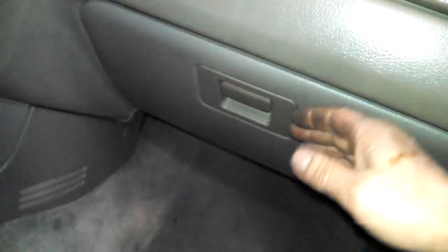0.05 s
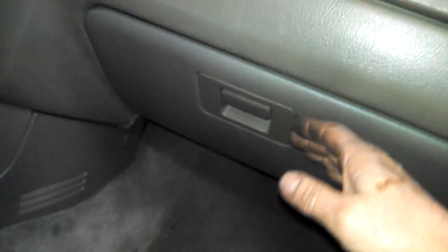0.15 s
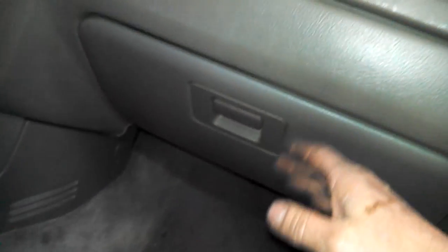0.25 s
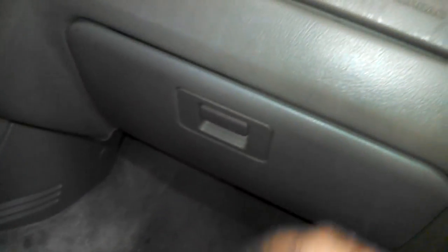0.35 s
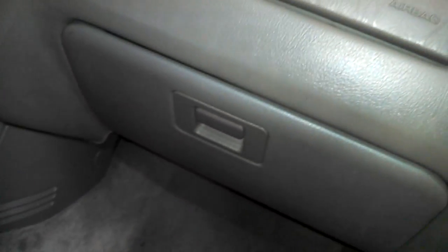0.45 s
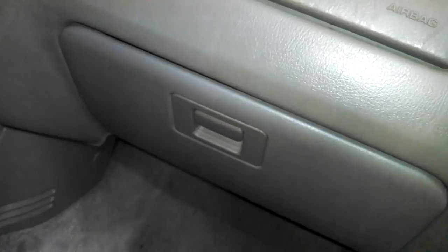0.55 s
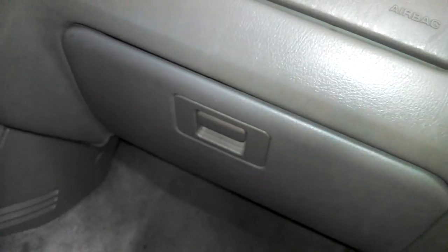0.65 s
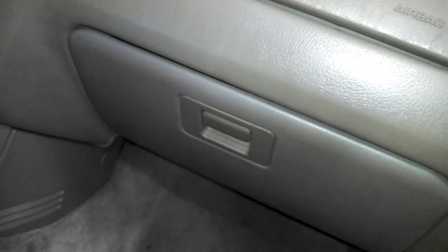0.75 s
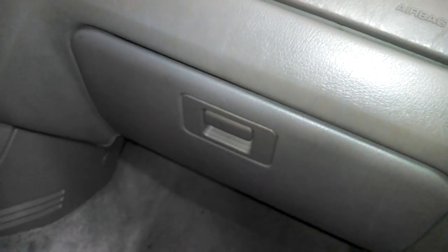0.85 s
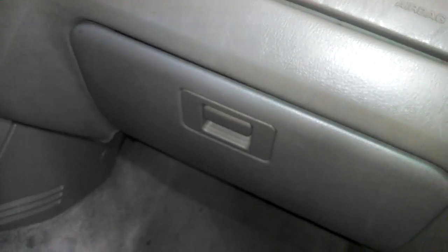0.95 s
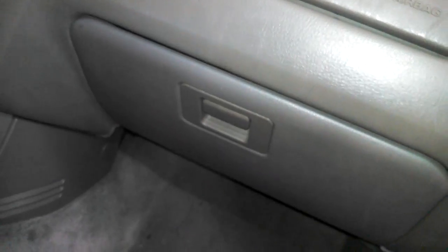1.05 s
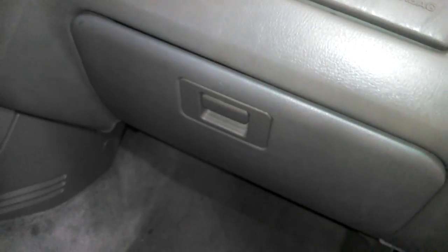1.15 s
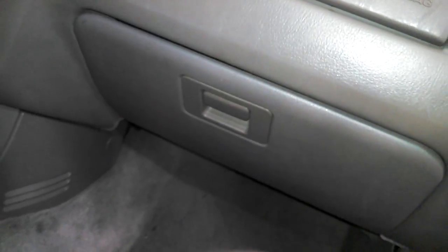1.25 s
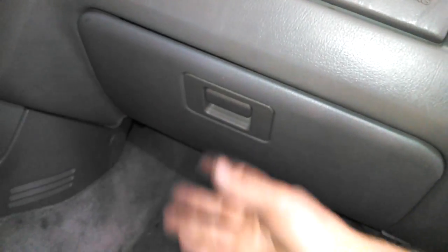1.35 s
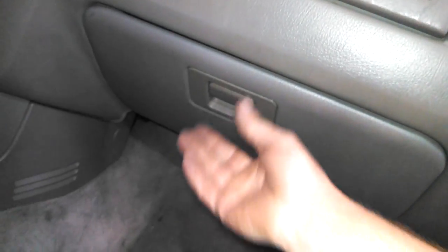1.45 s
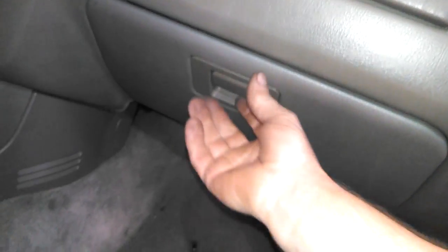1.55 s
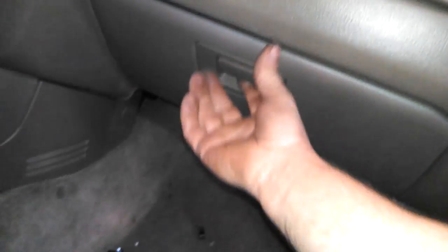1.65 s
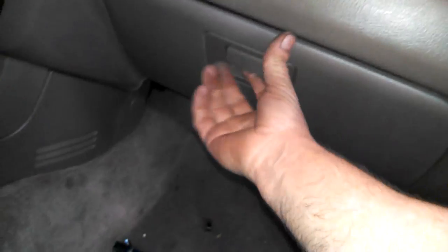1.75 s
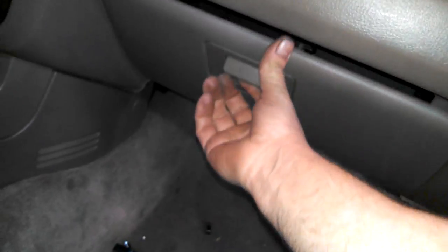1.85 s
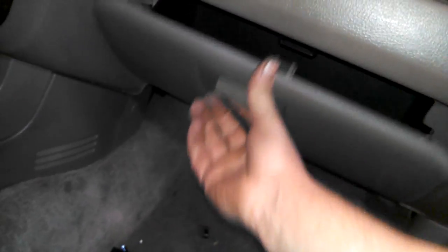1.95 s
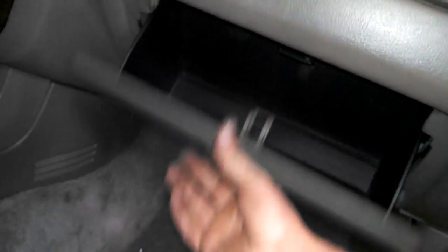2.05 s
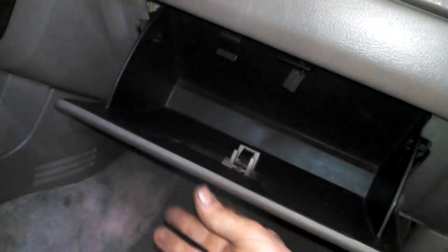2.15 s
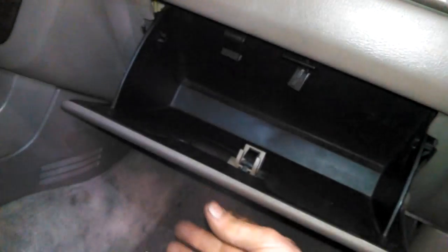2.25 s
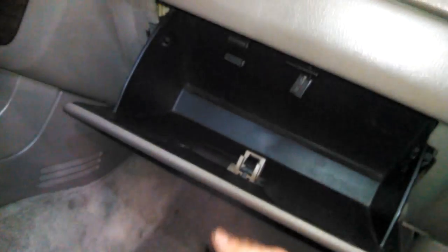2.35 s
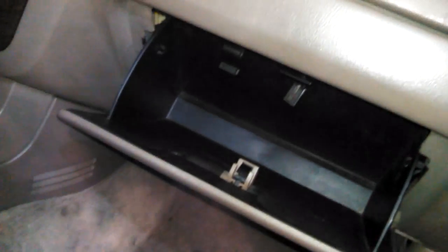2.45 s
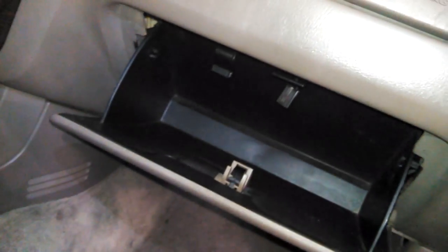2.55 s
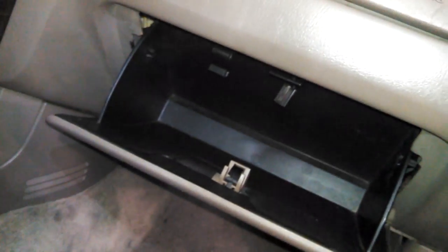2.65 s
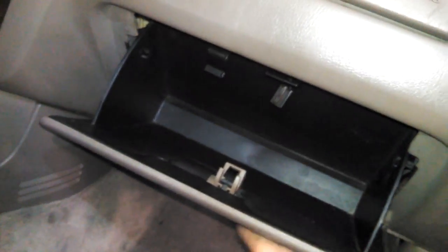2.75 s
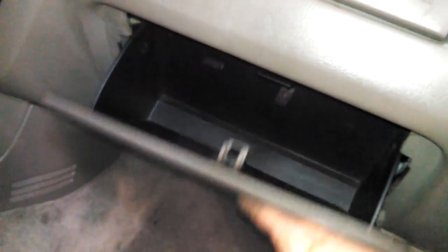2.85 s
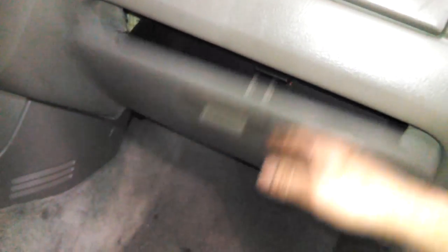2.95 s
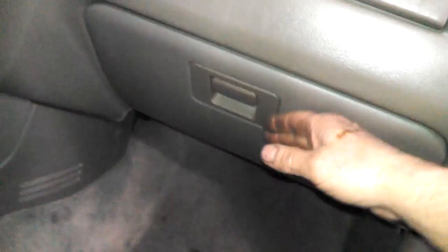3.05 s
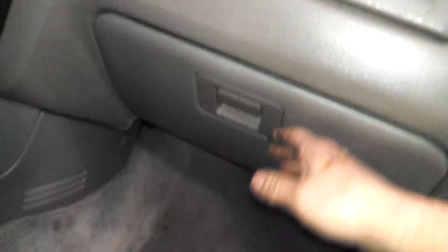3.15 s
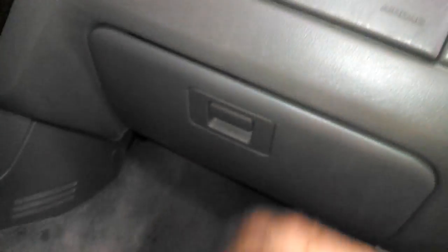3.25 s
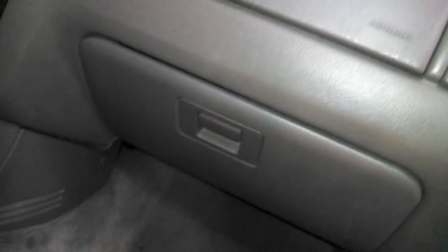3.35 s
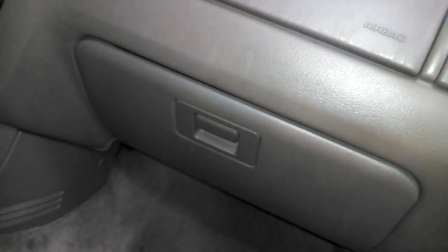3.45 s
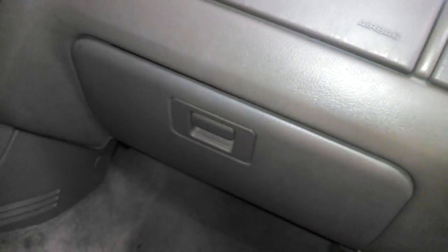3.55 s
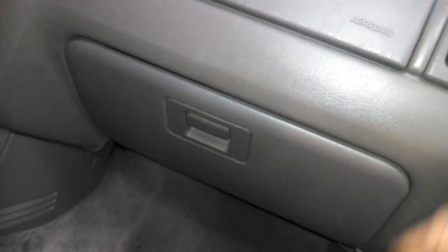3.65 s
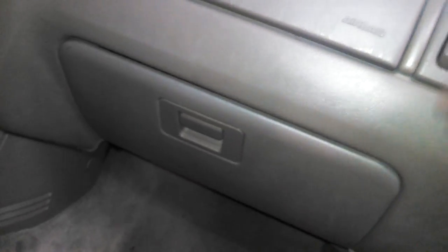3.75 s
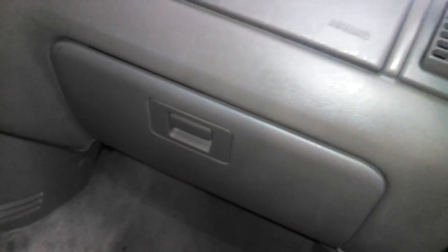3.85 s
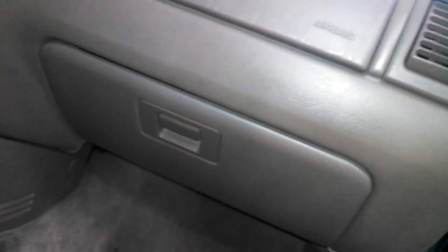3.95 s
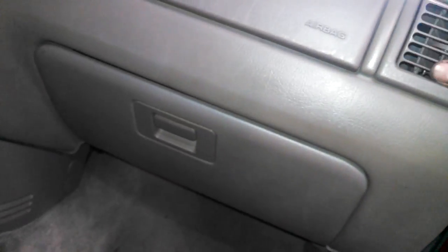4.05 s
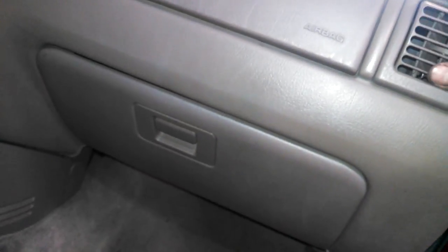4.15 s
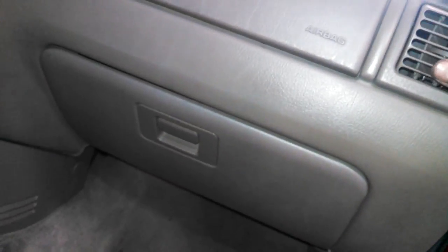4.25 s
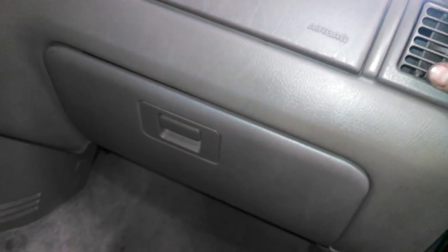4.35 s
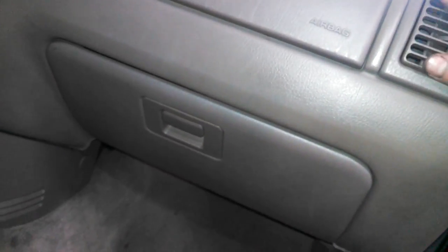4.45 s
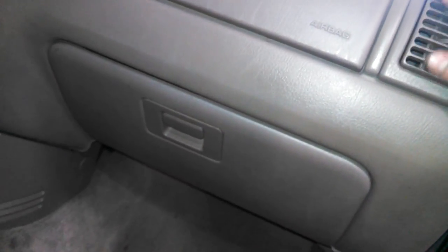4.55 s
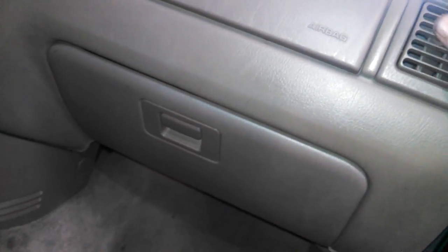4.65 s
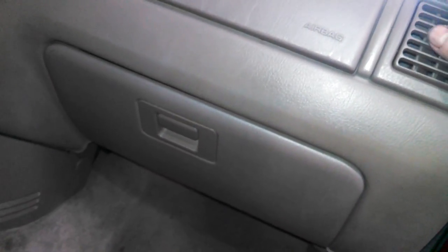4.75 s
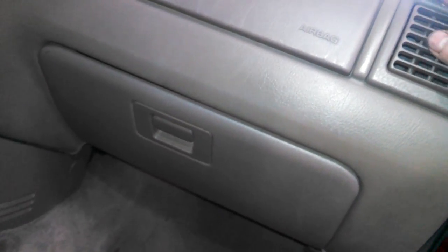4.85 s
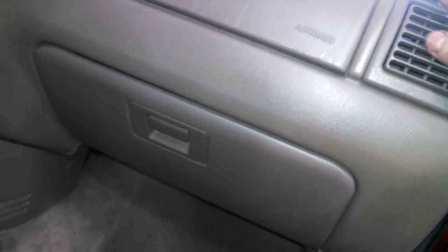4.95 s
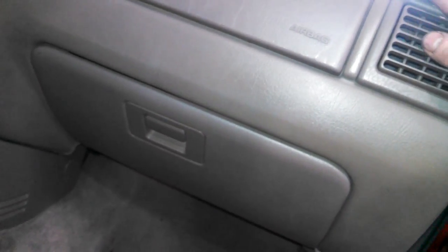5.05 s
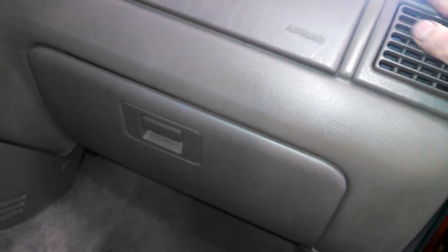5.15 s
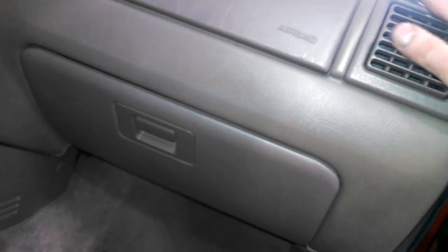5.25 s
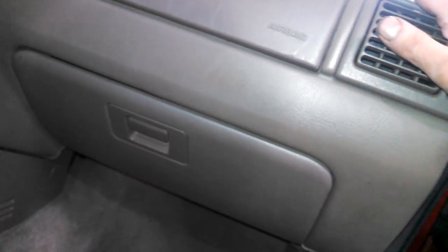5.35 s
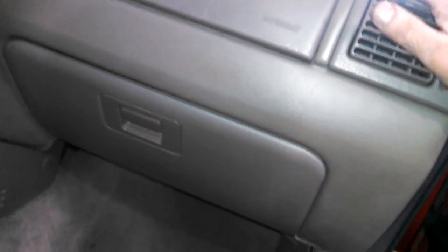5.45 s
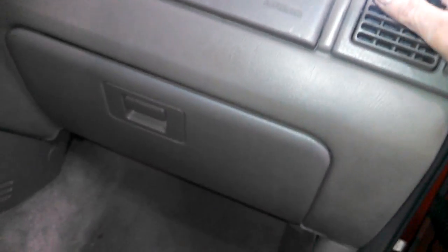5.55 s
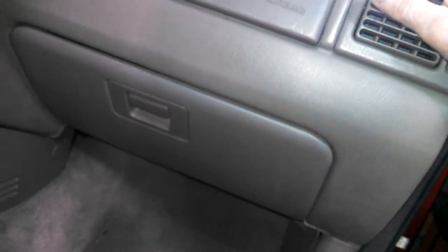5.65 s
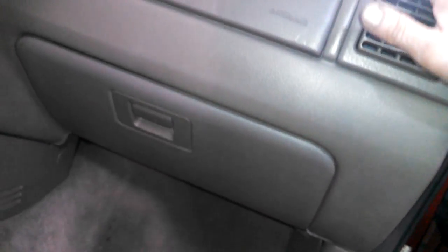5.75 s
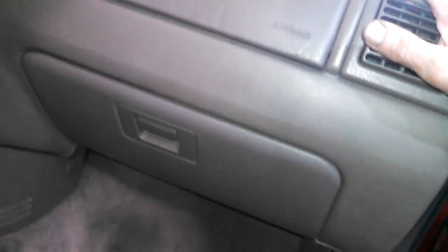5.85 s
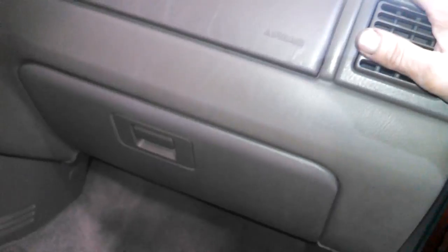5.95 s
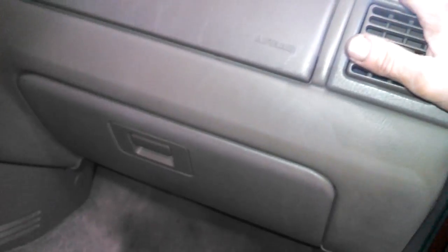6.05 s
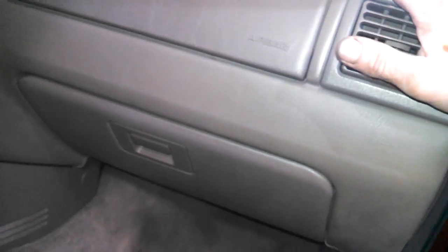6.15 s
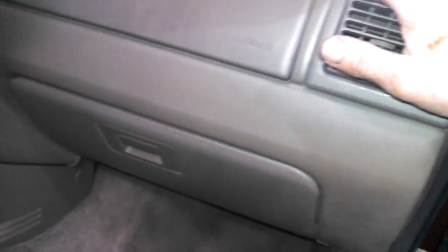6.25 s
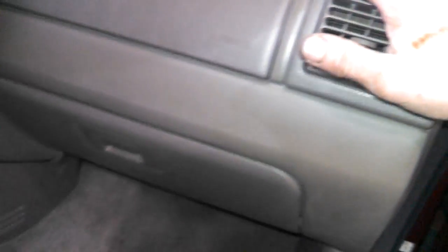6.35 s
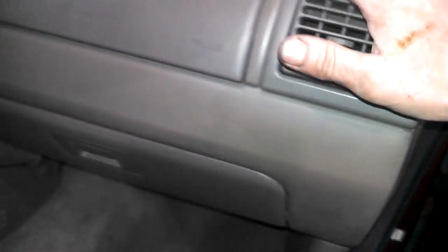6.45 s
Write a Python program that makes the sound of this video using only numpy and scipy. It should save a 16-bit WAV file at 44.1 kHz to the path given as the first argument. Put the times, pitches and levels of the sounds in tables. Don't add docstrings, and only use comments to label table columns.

```python
import sys
import numpy as np
from scipy import signal
from scipy.fft import rfft, irfft, next_fast_len
from scipy.io import wavfile
from scipy.ndimage import uniform_filter1d

SR = 44100
rng = np.random.default_rng(int(sys.argv[2]) if len(sys.argv) > 2 else 0)


def master(y):
    cut = np.clip(np.atleast_2d(y).T, -1, 1)
    pcm = np.round(cut * 32767)
    wavfile.write(sys.argv[1], SR, pcm.astype(np.int16))


def field_ratio(decibels):
    return 10 ** (np.asarray(decibels, dtype=float) / 20)


N = 286307

# [t/s, strength/dB]
SLAMS = [
    (.2740, 0),
    (3.2270, -.4),
]
# [delay/s, click level/dB, knock level/dB, knock f/Hz, tilt/(dB per octave)]
SLAM = [
    (0, -14, -20, 1700, -1.5),
    (.0023, -26, -13, 527, -1.5),
    (.0097, -10.5, -29.5, 1000, 2.5),
    (0.0114, -13.5, -26.5, 1300, -0.5),
    (0.0164, -19, -27, 800, 2),
]
# [t/s, click level/dB, knock level/dB, knock f/Hz, tilt/(dB per octave)]
TAPS = [(.2440, -22, -19, 3200, -5), (.2480, -44, -14.5, 860, -7), (.3990, -53, -56, 900, -4),
        (.4390, -44, -39, 1200, -3), (2.0072, -27, -32, 1510, 3), (2.0127, -14.5, -22.5, 2190, 0),
        (2.0160, -37, -34, 1800, 2), (2.0220, -51, -34, 1100, 0), (2.0320, -44, -45, 500, -19),
        (2.2878, -23.5, -31, 1230, 5), (2.2885, -31, -29, 1910, -0.2), (3.0340, -34.5, -31.5, 1490, -4.5),
        (3.1330, -28.5, -25, 1540, -0.2), (3.1355, -22.5, -29, 1900, 10), (3.2470, -40, -30, 190, -.1),
        (3.2500, -34, -35, 2280, -1.1), (3.2760, -46, -49, 3700, -1)]
# [f/Hz, width/Hz, level/dB]
LATCH_MODES = [(2200, 1500, -2), (4900, 1000, 3), (7300, 2000, -3), (9600, 1800, -1), (13000, 2200, -5),
               (15000, 1500, -5)]
# [f/Hz, width/Hz, level/dB]
PANEL_MODES = [(211, 150, -8), (1350, 1100, -11.5)]
# [f/Hz, t60/s]
CABIN_DECAY = [(200, .22), (3000, .14), (10000, .1)]
# [t/s, length/s, from f/Hz, to f/Hz, level/dB]
SQUEAKS = [
    (2.597, .062, 11400, 15800, -49),
    (2.66, .1, 13900, 14100, -51),
    (2.78, .078, 15050, 12800, -48),
    (2.755, .1, 12400, 11600, -53),
]
# [t/s, length/s, level/dB]
HISS = (.645, .33, -43)
# [f/Hz, width/Hz, level/dB]
HISS_MODES = [(12000, 1600, -3), (14200, 2200, 0)]
# [t/s, peak level/dB, f/Hz, t60/s]
BUMPS = [
    (3.776, -30, 80, .1),
    (3.819, -34, 260, .06),
    (3.874, -35, 85, .1),
    (4.268, -37, 90, .1),
]
# [f/Hz, level/dB]
AIR_SPECTRUM = [(60, -66), (170, -9.5), (330, -7), (650, -5.5), (900, -9.5), (1250, -16), (2000, -18.5),
                (4000, -24.5), (7000, -30), (9300, -29.5), (12000, -34), (15450, -32.5), (15750, -67),
                (20000, -120)]
# [f/Hz, width/Hz, level/dB]
DUCT_MODES = [(262.6, 22, -1), (393.3, 64.5, 2.5), (529.5, 108, 2.5), (846, 18, -6), (985, 74, -14),
              (1558, 51, -10), (2000, 31, -41), (3210, 300, -15.5)]
# [f/Hz, level/dB]
BOOM_SPECTRUM = [(20, -36), (35, -28), (47, -11), (60, 2), (90, -0.5), (150, -12), (220, -11.5), (400, -30),
                 (800, -120)]
# [f/Hz, width/Hz, level/dB]
FOOTWELL_MODE = [(113.5, 38.3, 0)]
# [f/Hz, phase turn/rad, level/dB, likeness/(0-1)]
PORT = [(40, .45, -1.8, .98), (65, .65, -3.5, .98), (95, 1.3, -7, .95), (120, 2, -9, .96),
        (150, 2.5, -3, .88), (300, 2.6, -.3, .9), (420, 3.4, -.3, .86), (600, 3.5, -2, .55),
        (720, 4.6, -1, .2), (900, 5.6, 0, .75), (1400, 6.2, 1.5, .93), (2050, 6.1, 3.5, .8),
        (2750, 6.28, .5, .97), (4400, 6.28, 1.5, .93), (15000, 6.28, .4, .94)]
# [t/s, depth/dB]
DUCKS = [
    (.246, 1.5),
    (0.273, 23),
    (2.014, 7.5),
    (2.29, 0.38),
    (3.133, 0.5),
    (3.23, 18.5),
]

RATTLE_S, RATTLE_S_PER_DB = 0.039, -0.15
GRAIN_DB = 4
LATCH_TOP_HZ = 16400
FULL_GAIN_DB, RECOVER_DB_PER_S = -1.5, 9
GRAB_S, SETTLE_S, SETTLE_SHARE = .013, .06, .3
PORT_LAG = 16


def along(points, hz, axis=1):
    columns = np.transpose(points)
    return np.interp(np.log(hz + 1), np.log(columns[0] + 1), columns[axis])


def unit(x):
    return x / np.sqrt(np.mean(x ** 2) + 1e-20)


def filtered(x, response):
    length = x.shape[-1]
    size = next_fast_len(length + 8192)
    return irfft(rfft(x, size) * response(np.fft.rfftfreq(size, 1 / SR)), size)[..., :length]


def modes(table):
    def response(f):
        total = 0
        for k, (centre, width, db) in enumerate(table):
            damping = 1j * f * width
            total = total + (-1) ** k * field_ratio(db) * damping / (centre * centre - f * f + damping)
        return total
    return response


def patchy(patchy_db):
    z = signal.stft(rng.standard_normal((2, N)), nperseg=512)[2]
    field = uniform_filter1d(rng.standard_normal(z.shape[1:]), size=6, axis=0)
    field = uniform_filter1d(field, size=12, axis=1)
    return signal.istft(z * field_ratio(patchy_db * unit(field)), nperseg=512)[1][:, :N]


def contacts():
    hits = list(TAPS)
    for s, db in SLAMS:
        for delay, click_db, knock_db, hz, tilt_db in SLAM:
            hits.append((s + delay, db + click_db, db + knock_db, hz, tilt_db))
    return hits


def latch_click(t, tilt_db):
    t60 = max(RATTLE_S + RATTLE_S_PER_DB * tilt_db, .012)
    grains = np.repeat(rng.standard_normal(len(t) // 40 + 1), 40)[:len(t)]
    fade = field_ratio(-60 * t / .006) + field_ratio(-7 - 60 * t / t60 + GRAIN_DB * grains)

    def colour(f):
        tilt = field_ratio(tilt_db * np.log2((f + 500) / 5000))
        return (f < LATCH_TOP_HZ) * modes(LATCH_MODES)(f) * tilt

    click = filtered(rng.standard_normal((2, len(t))) * fade, colour)
    return click / np.abs(click[0]).max()


def panel_knock(t, hz):
    blow = rng.standard_normal((2, len(t))) * field_ratio(-60 * t / 0.019) * (1 - np.exp(-t / 0.0056))
    panel = modes([(hz, .22 * hz, 0)] + list(PANEL_MODES))
    knock = filtered(blow, lambda f: panel(f) / (1 + 1j * f / (2 * hz)) ** 2)
    return knock / np.abs(knock[0]).max()


def door():
    out, t = np.zeros((2, N + SR)), np.arange(SR // 4) / SR
    for s, click_db, knock_db, knock_hz, tilt_db in contacts():
        hit = field_ratio(click_db) * latch_click(t, tilt_db) + field_ratio(knock_db) * panel_knock(t, knock_hz)
        answered = hit + field_ratio(-13) * cabin(hit[0])
        out[:, round(s * SR):][:, :len(t)] += field_ratio(-gain_db(s)) * answered
    return out[:, :N]


def cabin(x):
    hz, t, z = signal.stft(rng.standard_normal((2, SR // 4)), SR, nperseg=256)
    decay = field_ratio(-60 * t / along(CABIN_DECAY, hz)[:, None])
    tail = signal.istft(z * decay, SR, nperseg=256)[1]
    late = np.pad(x, (90, 0))[None]
    return signal.fftconvolve(late, tail / np.linalg.norm(tail[0]), axes=1)[:, :len(x)]


def handling():
    out, t = np.zeros(N + SR), np.arange(SR // 4) / SR
    for s, db, hz, t60 in BUMPS:
        envelope = field_ratio(-60 * t / t60) * (1 - np.exp(-t / .008))
        bump = np.sin(2 * np.pi * hz * t * (1 - 2 * t)) * envelope
        out[round(s * SR):][:len(t)] -= field_ratio(db - gain_db(s)) * bump / np.abs(bump).max()
    return out[:N] * [[1], [-.8]]


def swell(start, length):
    phase = np.clip((np.arange(N) / SR - start) / length, 0, 1)
    return np.sin(np.pi * phase).clip(0) ** .3


def squeaks():
    t, out = np.arange(N) / SR, 0
    for s, length, from_hz, to_hz, db in SQUEAKS:
        wander = 130 * unit(uniform_filter1d(rng.standard_normal(N), size=150))
        hz = from_hz + (to_hz - from_hz) * (t - s) / length + wander
        tone = np.sin(2 * np.pi * np.cumsum(hz) / SR)
        out = out + field_ratio(db) * swell(s, length) * tone * [[1], [0]]
    return out


def treble_hiss():
    start, length, db = HISS
    hiss = filtered(patchy(patchy_db=2.5), lambda f: modes(HISS_MODES)(f) ** 2 * (f < 15600))
    return field_ratio(db) * swell(start, length) * unit(hiss)


def blower():
    def colour(f):
        ducts = np.abs(modes(DUCT_MODES)(f)) ** 2 / (1 + (f / 2500) ** 4)
        return np.sqrt(field_ratio(along(AIR_SPECTRUM, f)) ** 2 + ducts)

    return field_ratio(-29) * unit(filtered(patchy(patchy_db=0.05), colour))


def engine():
    boom = filtered(patchy(patchy_db=1.5), lambda f: field_ratio(along(BOOM_SPECTRUM, f)))
    footwell = modes(FOOTWELL_MODE)
    hum = filtered(filtered(patchy(patchy_db=-0.1), footwell), footwell)
    return field_ratio(-33) * unit(boom) + field_ratio(-32) * unit(hum)


def scene():
    return door() + squeaks() + treble_hiss() + blower() + engine()


def gain_db(s):
    pull = 0
    for start, depth_db in DUCKS:
        since = np.clip(s - start, 0, None)
        fast = (1 - SETTLE_SHARE) * np.exp(-since / GRAB_S)
        slow = SETTLE_SHARE * np.exp(-since / SETTLE_S)
        pull = pull + depth_db * (1 - fast - slow)
    climb = RECOVER_DB_PER_S * np.clip(s - DUCKS[1][0], 0, None)
    return FULL_GAIN_DB + np.minimum(climb - pull, 0)


def second_port(dry):
    def alike(f):
        return np.clip(along(PORT, f, axis=3), 0, 1)

    def port(f):
        phase = along(PORT, f, axis=1) - 2 * np.pi * f * PORT_LAG / SR
        return -field_ratio(along(PORT, f, axis=2)) * np.exp(1j * phase)

    shared = filtered(dry[0], lambda f: port(f) * alike(f))
    own = filtered(dry[1], lambda f: port(f) * np.sqrt(1 - alike(f) ** 2))
    return shared + own


def band_limit(x):
    return signal.sosfilt(signal.butter(12, 16650, fs=SR, output="sos"), x)


def record(dry):
    ports = np.array([dry[0], second_port(dry)])
    mix = (ports + handling()) * field_ratio(gain_db(np.arange(N) / SR))
    return band_limit(mix)


dry = scene()
out = record(dry)
master(out)
```